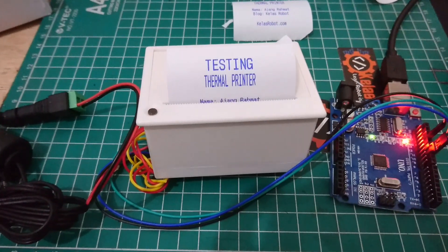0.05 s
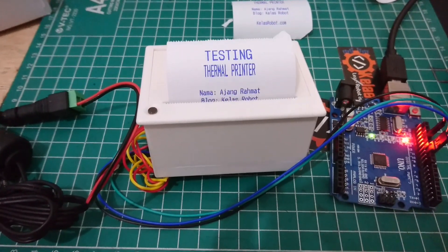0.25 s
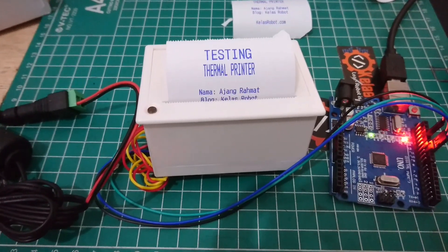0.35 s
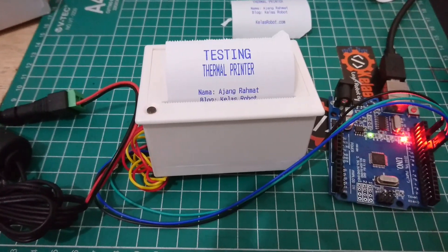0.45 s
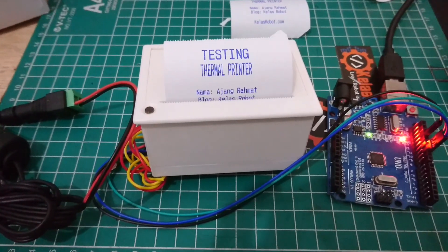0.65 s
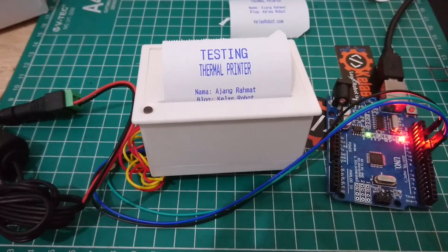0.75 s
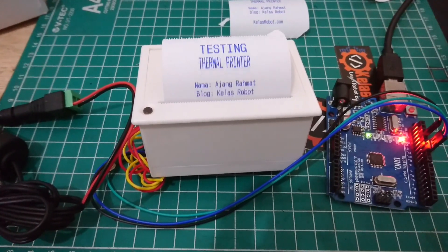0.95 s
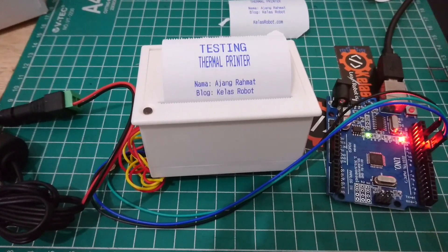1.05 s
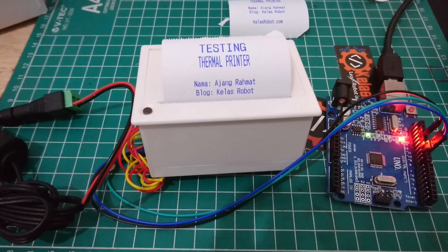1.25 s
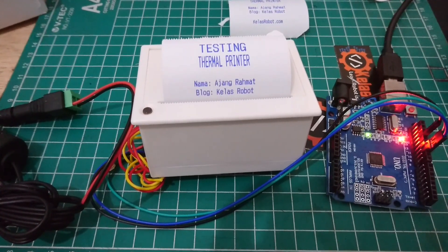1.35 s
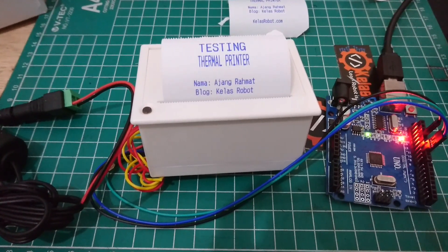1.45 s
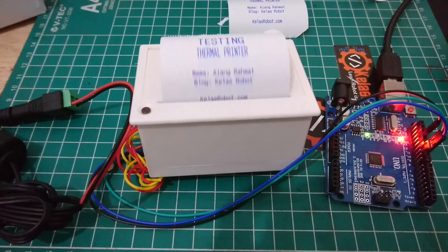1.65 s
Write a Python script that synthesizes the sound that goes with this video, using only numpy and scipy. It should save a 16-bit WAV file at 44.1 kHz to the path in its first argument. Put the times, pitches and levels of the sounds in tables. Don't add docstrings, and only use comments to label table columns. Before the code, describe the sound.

A small thermal printer feeds paper twice, close and left of centre. At 0.21 s a double gear knock starts a rasping motor buzz with a tiny high paper squeal, ending in a clack at 0.28 s. At 0.96 s a second knock starts a slightly longer buzz, stopping near 1.09 s. Short room reflections, steady low fan rumble; faint handling ticks between and after, clearest at 1.47 s.

```python
import sys
import numpy as np
from scipy import signal
from scipy.fft import rfft, irfft
from scipy.io import wavfile
from scipy.ndimage import uniform_filter1d

SR = 44100
rng = np.random.default_rng(int(sys.argv[2]) if len(sys.argv) > 2 else 0)


def ratio(d):
    e = np.asarray(d, float) / 20
    return 10 ** e


def int16_out(signal):
    q = np.round(np.clip(np.atleast_2d(signal).T, -1, 1) * 32767)
    wavfile.write(sys.argv[1], SR, q.astype(np.int16))


N = 74970

# (centre [Hz], width [Hz], left level [dB], right level [dB])
LID = [(800, 300, -8, -15), (1080, 183, -7.5, -15.5)]
WALLS = [(1587, 1400, -13, -19), (2056, 450, -9, -20), (2624, 310, -8.5, -17.5), (3096, 650, -7.5, -16.5)]
PARTS = [(5720, 300, -8.5, -14), (6550, 1100, -13.5, -24.5), (7650, 1700, -19, -26),
         (9000, 5400, -29.5, -29.5), (11100, 2900, -36.5, -34), (13100, 2000, -46, -35.5)]


def band(x, hz, width_hz):
    b, a = signal.iirpeak(hz, hz / width_hz, fs=SR)
    return signal.lfilter(b, a, signal.lfilter(b, a, x))


def ports(left_db, right_db):
    return ratio(np.array([[left_db], [right_db]]))


def bank(x, resonances):
    mix = 0
    for k, (hz, width_hz, left_db, right_db) in enumerate(resonances):
        mix = mix + (-1) ** k * ports(left_db, right_db) * band(x, hz, width_hz)
    return mix


def cut(x, hz, kind, order):
    return signal.sosfilt(signal.butter(order, hz, kind, fs=SR, output="sos"), x)


def unit(x):
    return x / np.sqrt(np.mean(x ** 2))


def walk(rate_hz):
    hold = int(SR / rate_hz)
    stairs = np.repeat(rng.standard_normal(N // hold + 1), hold)
    return unit(uniform_filter1d(stairs, hold)[:N])


def add(out, at_s, x):
    i = int(at_s * SR)
    out[..., i:i + x.shape[-1]] += x[..., :N - i]


def ring(hz, length_s, phase):
    attack_s, release_s, beat_hz, pair_db = .0004, .0003, 420, -10
    t = np.arange(400) / SR
    env = np.clip(t / attack_s, 0, 1) * np.exp(-np.maximum(t - length_s, 0) / release_s)
    main = np.sin(2 * np.pi * hz * t)
    pair = ratio(pair_db) * np.sin(2 * np.pi * (hz + beat_hz) * t + phase)
    return env * (main + pair) * 0.97


def knocks():
    # (time [s], ring level [dB], ring length [s])
    hits = [
        (.2106, -6, .0015),
        (.2141, -5, .0016),
        (.2240, -2.6, .002),
        (.2503, -16, .001),
        (.2842, -4, .0012),
        (.9629, -1.5, .0017),
        (.9662, -4, .0014),
        (.9740, -14, .0016),
        (1.0881, -13, .001),
        (1.6986, -33, .002),
    ]
    # (lid [dB], walls [dB], small parts [dB])
    shakes = [(5.5, -6.5, -3.5), (-0.5, 4, -3.5), (-3, 2.5, -2), (2.5, 0, -3), (-25, 4.5, -1.5),
              (-6, 0, -1.5), (-0.5, -0.5, -4.5), (-9, -3.5, -3), (-3, 5, -0.5), (-6.5, 0, -0.5)]
    ring_hz = 4350
    chatter_level_db, chatter_s = 7, .0014
    rattle_db, rattle_s = -9.5, .0025
    blow_db, blow_s, thud_lag_s = 3.5, .0024, .0011
    t = np.arange(1500) / SR
    rings, lid, thud = np.zeros((3, N))
    chatter, rattle = np.zeros((2, 2, N))
    for (at, db, length_s), (lid_db, thud_db, chatter_db) in zip(hits, shakes):
        noise = rng.standard_normal((6, len(t)))
        blow = ratio(db + blow_db) * np.exp(-(t / blow_s) ** 2)
        add(rings, at, ratio(db) * ring(ring_hz, length_s, 2 * np.pi * rng.random()))
        add(chatter, at, ratio(db + chatter_db + chatter_level_db) * (t < chatter_s) * noise[:2])
        add(lid, at, ratio(lid_db) * blow * noise[2])
        add(thud, at + thud_lag_s, ratio(thud_db) * blow * noise[3])
        add(rattle, at, ratio(db + rattle_db) * np.exp(-t / rattle_s) * noise[4:])
    return rings, rattle, bank(chatter, PARTS) + bank(thud, WALLS) + bank(lid, LID)


def motor():
    # (time [s], level [dB])
    feeds = [
        [(.213, -34), (.232, -26), (.245, -29), (.258, -25.5), (.275, -25), (.283, -24), (.2915, -24)],
        [(.966, -24.5), (.98, -32), (1.0, -29.5), (1.025, -27.5), (1.035, -23), (1.05, -27.5), (1.065, -28.5),
         (1.084, -28), (1.094, -41)],
    ]
    # (time [s], level [dB])
    thump_levels = [
        (.21, -38),
        (.29, -43),
        (.966, -38),
        (1.024, -38),
        (1.033, -28.5),
        (1.083, -27.5),
        (1.09, -45),
    ]
    # (centre [Hz], width [Hz], left level [dB], right level [dB])
    hum = [(790, 50, 9.5, -3.5), (1002, 140, 10.5, 3.5), (1235, 160, 8, 3.5), (1904, 900, 0, -9)]
    step_hz, step_at_s, jitter_steps, scatter_db = 260.5, 1.0315, .016, 2.8
    ring_hz, ring_top_hz, ring_spread, ring_s, ring_db = 4150, 4600, .1, .0012, 3
    thump_lag_s, thump_jitter_s, thump_scatter_db = .0006, .00009, 2.0
    click_db, rub_db, rub_flicker_db = 5.5, -2.5, 2
    t = np.arange(N) / SR
    rings, thump, push = np.zeros(N), np.zeros(N), np.zeros((2, N))
    steps = np.arange(step_at_s % (1 / step_hz), N / SR, 1 / step_hz)
    chance = rng.standard_normal((len(steps), 4))
    thump_at, thump_db = np.array(thump_levels).T
    for feed in feeds:
        at, db = np.array(feed).T
        load = ratio(np.interp(t, at, db)) * (t > at[0]) * (t < at[-1])
        for s, (late, size, pitch, turn) in zip(steps, chance):
            if not at[0] < s < at[-1]:
                continue
            blow = 20 * ratio(np.interp(s, thump_at, thump_db) + thump_scatter_db * turn)
            add(thump, s + thump_lag_s + thump_jitter_s * late, np.array([blow]))
            s = s + jitter_steps * late / step_hz
            gain = load[int(s * SR)] * ratio(scatter_db * size)
            hz = min(ring_hz * (1 + ring_spread * pitch), ring_top_hz)
            add(rings, s, gain * ratio(ring_db) * ring(hz, ring_s, turn))
            click = 2 * rng.standard_normal((2, 50)) * np.hanning(50)
            add(push, s, gain * ratio(click_db) * click)
        rub = ratio(rub_db + rub_flicker_db * walk(300)) * 2 * rng.standard_normal((2, N))
        push += load * rub
    return rings, push, bank(thump, hum)


def squeal():
    # (time [s], slip rate [Hz], level [dB])
    glide = [(.2555, 1160, -40), (.258, 1190, -17), (.263, 1265, -19), (.267, 1300, -21), (.270, 1285, -17),
             (.275, 1262, -17.5), (.2805, 1275, -20), (.283, 1275, -40)]
    # (multiple [1], left level [dB], right level [dB])
    partials = [(1, -17.5, -21.5), (2, -10.5, -22), (3, -2.5, -33), (3.6, -7.5, -30.5), (4, -10.5, -36.5),
                (5, -14, -20.5), (6, -29, -30)]
    wobble, flicker_db = .01, 1.8
    t = np.arange(N) / SR
    at, hz, db = np.array(glide).T
    phase = 2 * np.pi * np.cumsum(np.interp(t, at, hz) * (1 + wobble * walk(600))) / SR
    stack = np.zeros((2, N))
    for k, left_db, right_db in partials:
        stack += ports(left_db, right_db) * ratio(flicker_db * walk(500)) * np.sin(k * phase)
    return stack * ratio(np.interp(t, at, db)) * (t > at[0]) * (t < at[-1])


def ticks():
    # (time [s], level [dB], pitch [Hz], width [Hz], left minus right [dB])
    taps = [(0.531, -49.5, 2090, 900, 13), (.57, -66, 12300, 1490, -6), (0.7704, -49.5, 12300, 2550, -12),
            (0.769, -60, 4550, 1220, 11), (.77, -54.5, 9100, 1200, -5), (.799, -50.5, 4330, 1500, 10),
            (0.8, -53, 7100, 2500, -2), (0.8, -54.5, 12300, 3000, -10), (.881, -52.5, 12500, 3000, -10.5),
            (0.8916, -55, 12300, 2970, -22), (0.8915, -60, 4500, 1000, 14), (0.891, -54, 7160, 1500, -3),
            (1.314, -44, 2000, 500, -3), (1.468, -36.5, 2270, 800, -1.5), (1.468, -37.5, 2990, 596, 1),
            (1.468, -69, 4390, 900, -5)]
    decay_s = .0008
    out, t = np.zeros((2, N)), np.arange(600) / SR
    for at, db, hz, width_hz, pan_db in taps:
        tick = band(rng.standard_normal((2, len(t))) * np.exp(-t / decay_s), hz, width_hz)
        peak = np.abs(tick).max(axis=1, keepdims=True)
        add(out, at, tick / peak * ports(db + pan_db / 2, db - pan_db / 2))
    return out


def room(x):
    low_t60_s, high_t60_s, gap_s = .4, .52, .0013
    left_db, right_db, cross_db = -15.5, -8.5, -37
    t = np.arange(SR // 2) / SR
    noise = rng.standard_normal((3, len(t))) * np.clip(t / gap_s - 1, 0, 1)
    low = signal.lfilter(*signal.butter(1, 5000, fs=SR), noise)
    tail = low * ratio(-60 * t / low_t60_s) + (noise - low) * ratio(-60 * t / high_t60_s)
    tail = tail / np.sqrt(np.sum(tail ** 2, axis=1, keepdims=True))
    left, right, cross = signal.fftconvolve(x[[0, 1, 0]], tail, axes=1)[:, :N]
    return np.array([ratio(left_db) * left, ratio(right_db) * right + ratio(cross_db) * cross])


def air():
    # (frequency [Hz], density [dB per Hz])
    spectrum = [(15, -70), (25, -13), (75, -9), (267, -5), (552, -18.5), (684, -20), (2300, -31),
                (3260, -37), (15500, -52)]
    # (centre [Hz], width [Hz], left gain [dB], right gain [dB])
    humps = [(80, 18, 7.5, 6), (117, 26, 1, 1.5), (162.6, 14, 11.5, 7), (218, 70, -1, 4), (293.3, 32, 6, 2),
             (448, 17, 1, 9.5), (2240, 230, 7.5, 6), (4500, 330, 7, -16.5), (12300, 1500, -2.5, 0)]
    level_db, left_db, alike_hz = -44.5, .7, 950
    f = np.fft.rfftfreq(N, 1 / SR) + 1
    hz, density_db = np.array(spectrum).T
    db = np.interp(np.log(f), np.log(hz), density_db)
    for hump_hz, width_hz, left, right in humps:
        db = db + np.array([[left], [right]]) * np.exp(-2 * ((f - hump_hz) / width_hz) ** 2)
    alike = .93 * np.exp(-(f / alike_hz) ** 3)
    mid, side = rfft(rng.standard_normal((2, N)))
    sign = np.array([[1], [-1]])
    both = mid * np.sqrt(1 + alike) + sign * side * np.sqrt(1 - alike)
    return unit(irfft(both * ratio(db), N)) * ratio(level_db + sign * left_db)


def scene():
    # (centre [Hz], width [Hz], left level [dB], right level [dB])
    port_modes = [(3426, 2400, -2.5, -42), (4500, 730, 3, -40.5)]
    port_edge_hz, case_low_hz, case_top_hz = 4920, 640, 14300
    ring_right_db, ring_room_db, right_lag_s = -40, -4, .00025
    knock_rings, rattle, knock = knocks()
    step_rings, push, hum = motor()
    push = push + rattle
    rings = cut(knock_rings + step_rings, port_edge_hz, "low", order=4) * ports(0, ring_right_db)
    port_sound = cut(bank(push[0], port_modes), port_edge_hz, "low", order=8)
    case = port_sound + bank(push[0], LID + WALLS) + bank(push, PARTS) + knock + hum + squeal()
    case = cut(case, case_low_hz, "high", order=4)
    case = cut(case, case_top_hz, "low", order=12)
    case[1] = np.concatenate([np.zeros(int(right_lag_s * SR)), case[1]])[:N]
    return case + rings + room(case + ratio(ring_room_db) * rings) + ticks() + air()


def roll_off(x):
    return signal.sosfilt(signal.butter(12, 15660, fs=SR, output="sos"), x)


def record(dry):
    low_cut_hz, ceiling = 45, 3.0
    x = cut(dry, low_cut_hz, "high", order=3)
    return roll_off(ceiling * np.tanh(x / ceiling))


dry = scene()
out = record(dry)
int16_out(out)
```